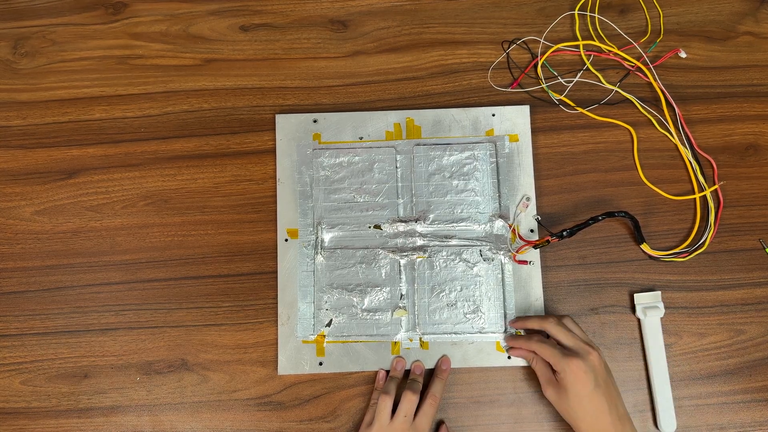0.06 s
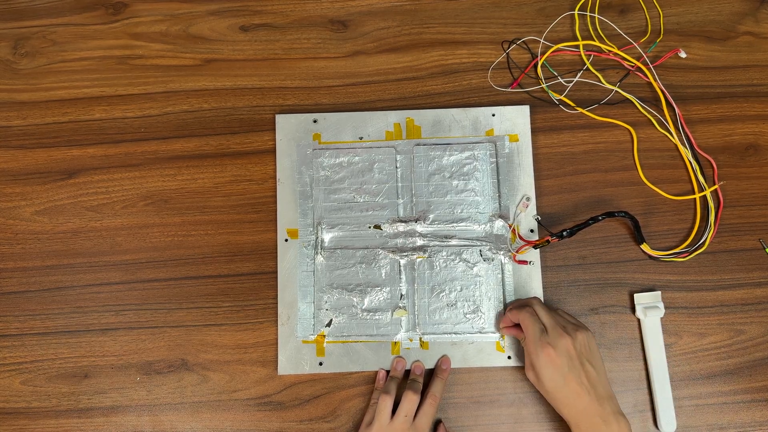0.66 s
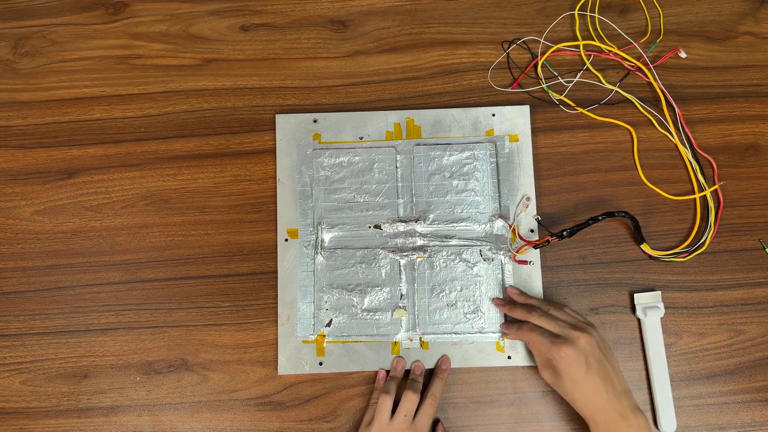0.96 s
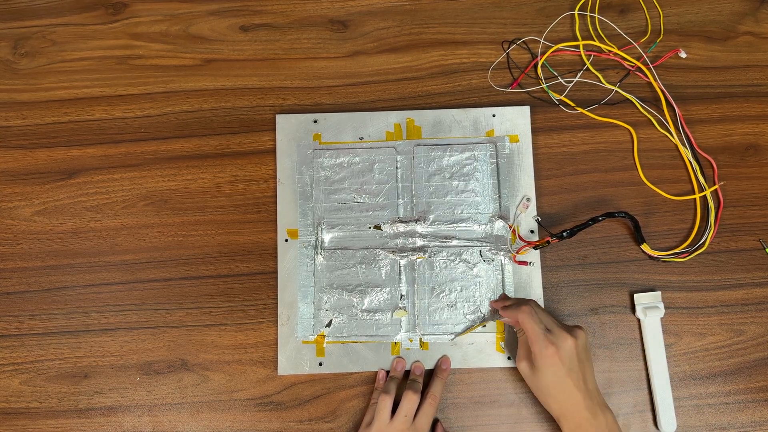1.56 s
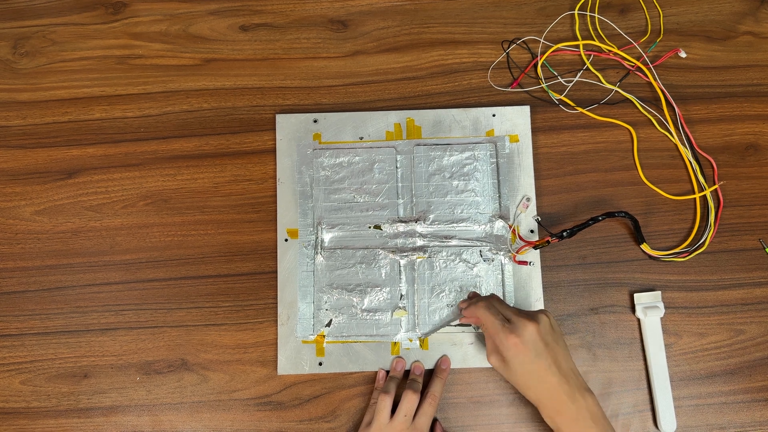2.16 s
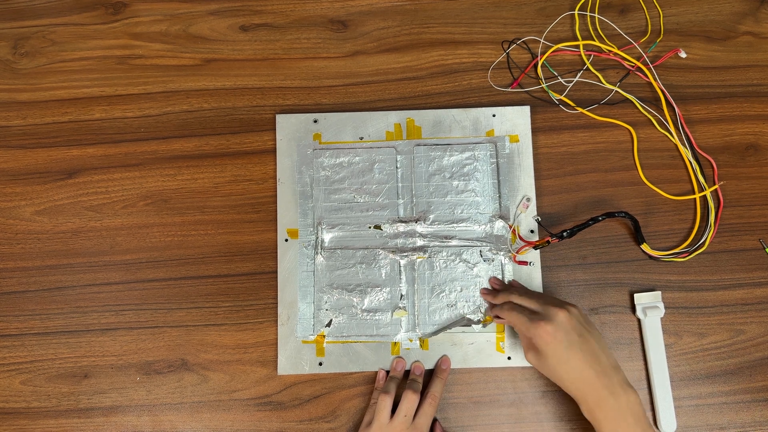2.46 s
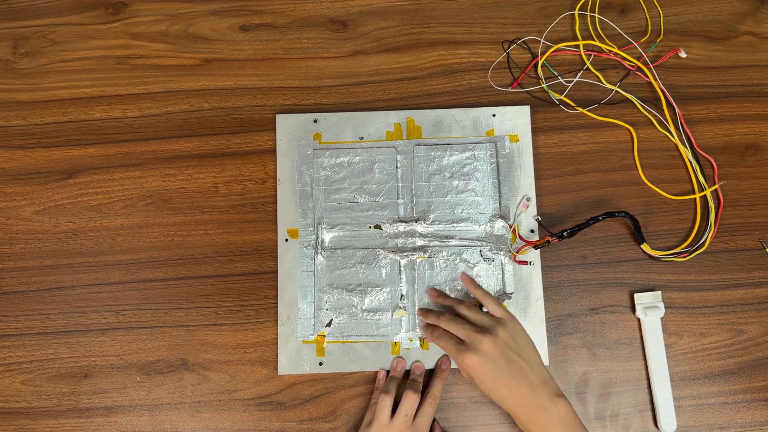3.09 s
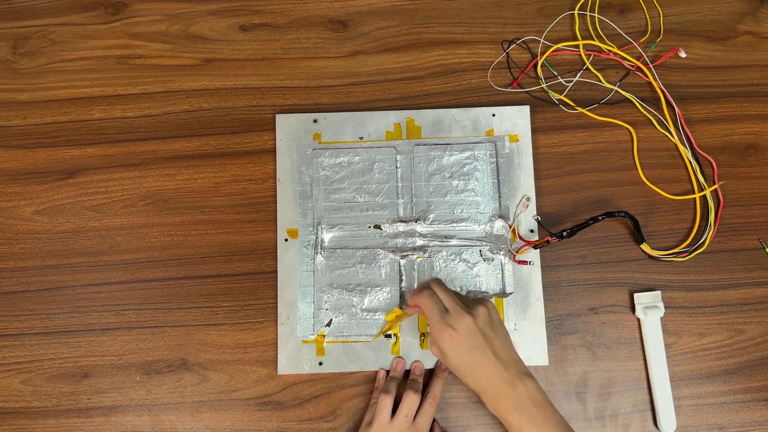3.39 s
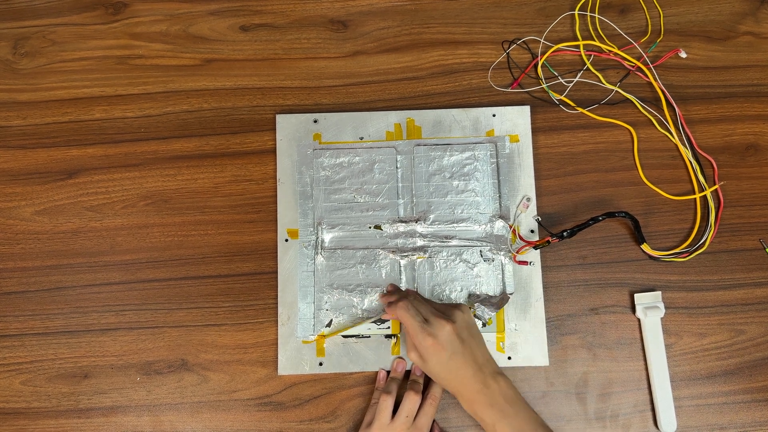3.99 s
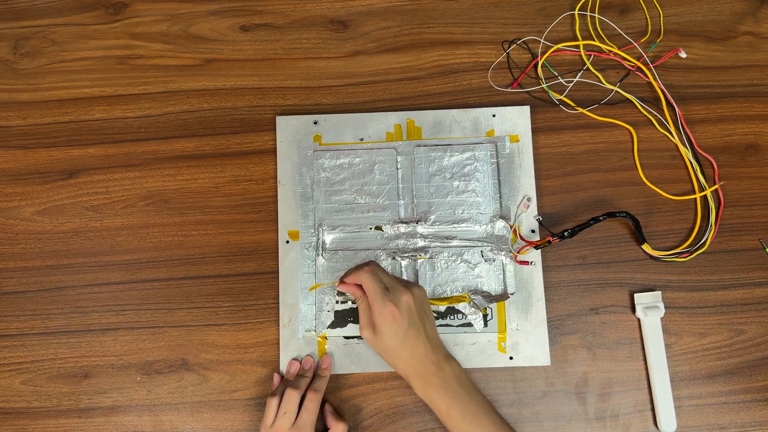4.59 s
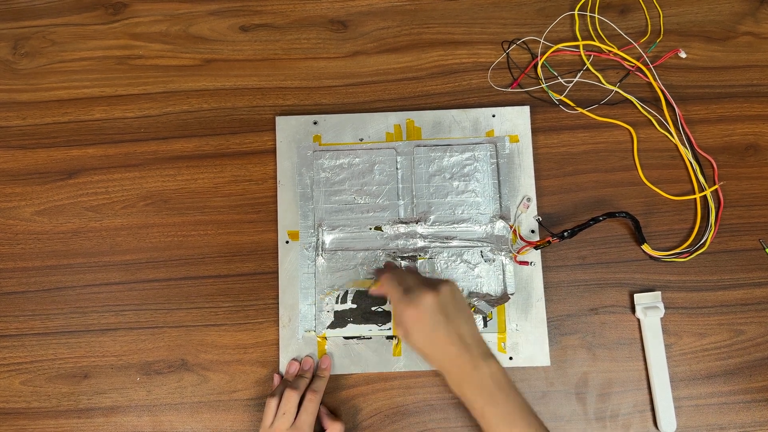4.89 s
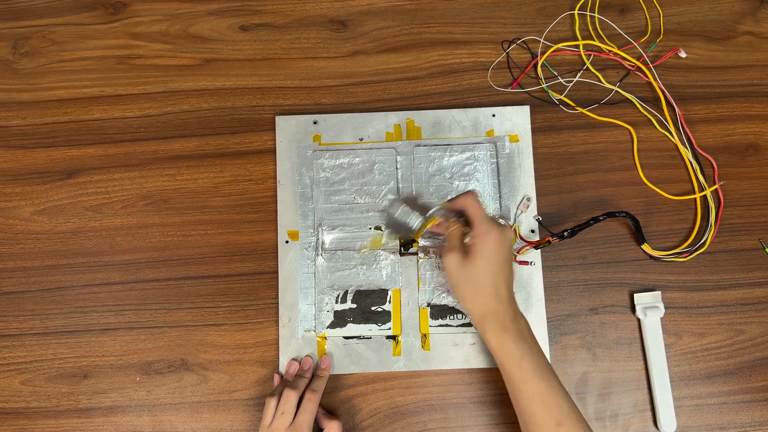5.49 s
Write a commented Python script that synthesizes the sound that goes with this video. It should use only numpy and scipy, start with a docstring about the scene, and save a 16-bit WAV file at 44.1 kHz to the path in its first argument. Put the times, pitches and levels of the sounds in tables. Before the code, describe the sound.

Aluminium foil tape is picked loose from a metal plate with faint ticks and crackles, then pulled off in short, irregular tugs that grow louder. The glue fizzes, the foil crinkles and its creases snap, with one brief squeak early on. Harder pulls bump the plate softly on a wooden bench, and fingertips lightly pat the foil. It is heard close up in a small quiet room with low ventilation rumble.

```python
"""A wooden bench in a small quiet room, heard from close by through a camera's two microphone ports.
Straight ahead, aluminium foil tape is picked loose and pulled off a metal plate in short tugs.
The glue lets go in a fine fizz, the foil crinkles, its creases snap and the taut strip squeaks once.
Hard tugs bump the plate on the bench, and fingertips pat the foil. Ventilation rumbles low behind it."""
import sys
import numpy as np
from scipy import signal
from scipy.fft import rfft, irfft, next_fast_len
from scipy.io import wavfile
from scipy.ndimage import uniform_filter1d, map_coordinates

SR = 44100
rng = np.random.default_rng(int(sys.argv[2]) if len(sys.argv) > 2 else 0)


def master(y):
    """Save y as 16-bit WAV."""
    cut = np.clip(np.atleast_2d(y).T, -1, 1)
    pcm = np.round(cut * 32767)  # scale
    wavfile.write(sys.argv[1], SR, pcm.astype(np.int16))


N = 253507

# tone of the crinkling foil: freq_hz, level_db
FOIL_SPECTRUM = [(100, -2), (250, -14.5), (600, -6.5), (850, -13), (1200, -2), (2000, -2.5), (2600, -4.5),
                 (3500, -0.5), (4600, -11), (6500, -9), (15000, -22)]
# tone of the fizzing glue: freq_hz, level_db
GLUE_SPECTRUM = [(1000, -47.5), (2500, -7.5), (4000, -3.5), (5000, -3.5), (7000, 3), (9000, 1.5),
                 (12000, 0), (16000, -3)]
FOIL_TRIM_DB, GLUE_TRIM_DB = -0.26, -0.64
def peeling():
    """The tape sticks and slips: glue threads part and the foil crumples in the same quick spurts."""
    crinkle_db, fizz_db = pulling()
    spurts = unit(amp(1.3 * wobble(70) + .9 * wobble(300)))
    foil = crackle(FOIL_SPECTRUM, band_hz=(1000, 4000), spread_db=2.0, ring_s=0.0011, favour_db=5.0)
    glue = crackle(GLUE_SPECTRUM, band_hz=(5000, 10000), spread_db=-1.5, ring_s=0.00011, favour_db=5.5)
    # the low mids fill out as more strip comes free, and are a smaller share of a loud pull
    body = filtered(foil, lambda f: 1 / (1 + (f / 900) ** 8))
    body_db = 2.05 * (np.arange(N) / SR - 3.7) - 0.16 * (crinkle_db + 36)
    foil += body * (amp(np.clip(body_db, -6, 6)) - 1)
    # a gentle pull parts only the finest threads, so it sounds brighter
    finest = filtered(glue, lambda f: 1 / (1 + (9000 / (f + 1)) ** 8))
    bright_db = -.15 * (fizz_db + 50)
    glue += finest * (amp(np.clip(bright_db, -4, 5)) - 1)
    return spurts * (foil * amp(crinkle_db + FOIL_TRIM_DB) + glue * amp(fizz_db + GLUE_TRIM_DB))


# slow steady peeling: start_s, length_s, crinkle_db, fizz_db
SLOW_PEELS = [(0.301, 0.12, -93, -78), (1.05, .16, -81, -71), (1.246, 0.044, -67, -57),
              (1.335, 0.22, -64, -57), (2.11, 0.085, -74, -66), (2.689, 0.11, -58, -56.5),
              (3.1, 0.03, -68.5, -64), (3.821, 0.042, -63, -64.5), (3.885, 0.088, -53.5, -54.5),
              (4.403, .09, -60.5, -75), (5.088, 0.054, -61, -63.5), (5.335, 0.069, -62, -62.5),
              (5.647, 0.076, -65, -54)]
# short tugs, with the loose foil's resonance: full_force_s, rise_s, hold_s, crinkle_db, fizz_db, foil_hz
SHORT_TUGS = [(0.449, 0.032, 0.0066, -82, -64.5, 6700), (0.667, 0.058, .005, -62.5, -59.5, 3000),
              (1.502, .08, 0.023, -63, -54.5, 1500), (1.7, 0.03, 0.0044, -66.5, -63.5, 4500),
              (1.959, 0.089, .012, -52, -52.5, 4600), (1.987, 0.017, 0.0072, -39.5, -45.5, 4700),
              (2.278, 0.07, 0.011, -61, -62, 4600), (2.443, 0.0071, .003, -65.5, -71.5, 4500),
              (2.611, 0.12, 0.048, -48, -49.5, 4640), (2.849, 0.083, 0.016, -50.5, -47.5, 4570),
              (2.954, 0.023, 0.01, -55.5, -61.5, 1980), (3.175, 0.049, 0.027, -55, -59.5, 2700),
              (3.276, 0.11, 0.038, -49.5, -49, 3500), (3.406, 0.049, 0.015, -39, -37, 2100),
              (3.569, 0.013, 0.0049, -51, -57.5, 2200), (3.714, 0.025, .005, -62, -82, 1900),
              (4.05, 0.097, 0.02, -36.5, -37.5, 3000), (4.178, 0.025, 0.05, -54.5, -60, 1150),
              (4.536, .075, 0.013, -39, -49, 1400), (4.566, 0.037, 0.021, -36.5, -41, 750),
              (4.941, 0.068, 0.022, -34.5, -36.5, 2900), (5.015, 0.065, 0.021, -54.5, -52, 3330),
              (5.192, 0.046, .004, -69, -62.5, 4000), (5.421, 0.029, 0.0054, -47.5, -36.5, 4500),
              (5.552, 0.038, 0.0086, -40.5, -31.5, 3300)]
def pulling():
    """Peels, tugs and snaps work the tape; returns the running crinkle and fizz levels in dB."""
    crinkle, fizz = np.zeros((2, N))

    def pull(s, crinkle_db, fizz_db, rise_s, hold_s, swell_db=0):
        lead_s = .15
        t = np.arange(round(.8 * SR)) / SR - lead_s
        shape_db = pull_shape(t, rise_s, hold_s, swell_db)
        add(crinkle, s - lead_s, amp(crinkle_db + shape_db) ** 2)
        add(fizz, s - lead_s, amp(fizz_db + shape_db) ** 2)

    for s, length_s, crinkle_db, fizz_db in SLOW_PEELS:  # a peel swells as the strip tightens
        pull(s, crinkle_db, fizz_db, rise_s=0.037, hold_s=length_s, swell_db=1.5)
    for s, rise_s, hold_s, crinkle_db, fizz_db, _ in SHORT_TUGS:
        pull(s, crinkle_db, fizz_db, rise_s, hold_s)
    for s, _, _, crack_db, _ in CREASE_SNAPS:  # a snap shakes the foil around it
        pull(s, crack_db - 26, crack_db - 25, rise_s=0.012, hold_s=0.012)
    return 10 * np.log10(np.array([crinkle, fizz]) + 1e-11)


RISE_DB, RELEASE_DB_PER_S = 33, 484.5
SETTLE_DB, SETTLE_DB_PER_S = -9.5, 259
def pull_shape(t, rise_s, hold_s, swell_db):
    """One pull in dB: it builds and holds, the hand eases, and the crumpled foil settles quietly."""
    building = RISE_DB * np.minimum(t, 0) / rise_s
    swelling = swell_db * (np.clip(t / hold_s, 0, 1) - .5)
    after_s = np.maximum(t - hold_s, 0)
    easing = np.maximum(-RELEASE_DB_PER_S * after_s, SETTLE_DB - SETTLE_DB_PER_S * after_s)
    return building + swelling + easing


def crackle(spectrum, band_hz, spread_db, ring_s, favour_db, clicks_per_s=9000):
    """Dense tiny clicks of uneven size, each ringing a facet of its own pitch; rms 1 within band_hz."""
    when, pitch, chance, phase = rng.random((int(clicks_per_s * N / SR), 4)).T[:, :, None]
    t = np.arange(160) / SR
    hz = 300 * (SR / 2 / 300) ** pitch
    # facets near the loose foil's resonance ring louder
    tug_s, *_, foil_hz = np.transpose(SHORT_TUGS)
    octaves_off = np.log2(hz / np.interp(when * N / SR, tug_s, foil_hz))
    resonance_db = favour_db * np.exp(-(octaves_off / 0.43) ** 2)
    uneven_db = spread_db * np.minimum(-np.log(1 - chance), 3)
    size = amp(uneven_db + resonance_db) * np.sqrt(hz)
    grains = size * np.exp(-t / ring_s) * np.sin(2 * np.pi * (hz * t + phase))
    positions = (when * N).astype(int) + np.arange(len(t))
    clicks = np.bincount(positions.ravel(), grains.ravel(), N)[:N]
    sound = flexing(filtered(clicks, lambda f: amp(along(spectrum, f))))
    return sound / np.std(filtered(sound, lambda f: (f > band_hz[0]) & (f < band_hz[1])))


# resonances of the freed strip: centre_hz, width_hz, lift_db
STRIP_RESONANCES = [(720, 200, 3.5), (1110, 190, 4.5), (2017, 140, 10), (3330, 300, -1.5), (4570, 300, 5),
                    (4900, 370, 3), (9350, 530, 2), (12200, 810, 3.5)]
def flexing(x, patchy_db=3.5):
    """The bending foil favours new pitches from moment to moment, over the strip's own resonances."""
    hz, _, spectra = signal.stft(x, SR, nperseg=256)
    patches = uniform_filter1d(rng.standard_normal(spectra.shape), size=3, axis=0)
    patches = unit(uniform_filter1d(patches, size=11, axis=1))
    lift_db = sum(db / (1 + (2 * (hz - centre) / width) ** 2) for centre, width, db in STRIP_RESONANCES)
    return signal.istft(spectra * amp(patchy_db * patches + lift_db[:, None]), SR, nperseg=256)[1][:N]


# creases snapping through: start_s, ring_db, pitch_hz, crack_db, t60_s
CREASE_SNAPS = [(0.457, -50.5, 6750, -46, 0.042), (0.557, -46, 7270, -46.5, 0.016),
                (0.857, -43, 3680, -36, 0.017), (1.2298, -32, 3910, -29, 0.023),
                (1.658, -55, 1600, -54.5, 0.014), (1.9932, -33, 4500, -23.5, 0.016),
                (2.785, -39, 1810, -36.5, 0.013), (3.25, -44, 6830, -37, 0.028),
                (3.28, -36.5, 3970, -41.5, .017), (3.3975, -34, 1960, -49, 0.019),
                (3.415, -28, 2075, -33, 0.034), (3.431, -29, 2066, -20, 0.034),
                (3.504, -41, 3300, -34, 0.01), (3.7617, -49, 6500, -40.5, 0.02),
                (3.891, -25.5, 1917, -35.5, 0.014), (4.011, -40, 1974, -54, 0.069),
                (4.0359, -28.5, 2150, -28, 0.014), (4.0455, -31, 2980, -36, 0.0061),
                (4.0605, -24.5, 3616, -22, 0.015), (4.17, -41, 3820, -55, 0.012),
                (4.545, -29, 1770, -39, 0.014), (4.703, -51, 1710, -38.5, 0.012),
                (4.749, -34, 2160, -39, 0.01), (4.79, -48, 4300, -43, 0.014),
                (4.8749, -41, 2120, -38.5, 0.011), (4.8905, -34, 2000, -50, 0.0082),
                (4.929, -31, 2090, -46, 0.022), (4.938, -29.5, 3250, -29, 0.059),
                (5.042, -54, 3230, -37, 0.016), (5.421, -27, 7130, -26, 0.011),
                (5.426, -38, 7130, -24, .022), (5.542, -36, 6450, -30, 0.017),
                (5.553, -15.5, 4960, -16.5, 0.0097), (5.5622, -18.5, 4370, -25.5, 0.0084),
                (5.688, -42, 6340, -35, 0.017)]
def snaps():
    """Creases buckle with a crack and a ring; the longer a snap lasts, the brighter its crack."""
    track, t = np.zeros(N), np.arange(2048) / SR
    for s, ring_db, hz, crack_db, t60 in CREASE_SNAPS:
        tilt = max(8.5 * np.log2(t60 / 0.018), -2.5)
        snap = amp(ring_db) * fold(hz, t) + amp(crack_db) * crack(t, tilt)
        add(track, s, snap * struck(t, t60))
    return track


def fold(hz, t):
    """A fold's ring at rms 1; it changes shape while it rings, so the pitch wavers."""
    phase = 2 * np.pi * hz * t + 0.13 * np.cumsum(rng.standard_normal(len(t)))
    return unit(np.sin(phase) + amp(-6.5) * np.sin(1.55 * phase))


# tone of a crack before its tilt: freq_hz, level_db
CRACK_SPECTRUM = [(300, -24), (1200, -9.5), (3000, 0), (6000, -3.5), (10000, 0), (15800, -6.5),
                  (18000, -36)]
def crack(t, tilt_db_per_octave):
    """The dry noise of a snap, tick or pat, at rms 1."""
    tone = lambda f: amp(along(CRACK_SPECTRUM, f) + tilt_db_per_octave * np.log2(f + 300))
    return unit(filtered(rng.standard_normal(len(t)), tone))


# the plate dropping back on the bench: start_s, level_db, pitch_hz, overtone_db, t60_s
PLATE_BUMPS = [(0.674, -42, 127, -19, 0.11), (1.235, -34, 150.5, -1, 0.08), (2.002, -31, 125.3, -17, 0.16),
               (2.624, -41.5, 131, -3, 0.13), (2.971, -40.5, 128, -28, 0.095),
               (3.297, -38, 131, -35.5, 0.25), (3.428, -36.5, 121, -29, 0.2), (4.069, -33, 149, -21, 0.12),
               (4.548, -37, 130.8, -12, 0.22), (4.583, -30.5, 142, -18.5, 0.12),
               (4.954, -40, 167, -27, 0.16), (5.434, -33.5, 131, -19.5, 0.23),
               (5.561, -31, 129, -18.5, 0.21)]
def bumps():
    """The plate gives a short soft boom on the bench top, with an overtone that dies sooner."""
    track, t = np.zeros(N), np.arange(SR // 3) / SR
    for s, db, hz, overtone_db, t60 in PLATE_BUMPS:
        bend = 0.017 * np.cumsum(rng.standard_normal(len(t)))  # the hand's pressure bends the pitch
        phase = 2 * np.pi * hz * t + bend
        overtone = amp(overtone_db + 3.0) * np.sin(1.806 * phase) * amp(-40 * t / t60)
        add(track, s, amp(db + 0.5) * (np.sin(phase) + overtone) * struck(t, t60, attack_s=0.00099))
    return track


# glue threads breaking: start_s, level_db
THREAD_TICKS = [(0.298, -59), (0.659, -43), (1.077, -40.5), (1.8995, -41), (2.609, -34), (4.064, -22),
                (4.375, -42.5), (4.535, -32), (5.519, -33), (5.656, -30)]
def ticks():
    """Single glue threads break with a bright tick and no ring."""
    track, t = np.zeros(N), np.arange(2048) / SR
    for s, db in THREAD_TICKS:
        add(track, s, amp(db) * crack(t, tilt_db_per_octave=11) * struck(t, t60_s=0.02))
    return track


# fingertips on the foil: start_s, level_db
FINGER_PATS = [(4.186, -44), (4.223, -42), (4.397, -51)]
def pats(pitch_hz=1127):
    """Fingertips pat the foil and ring it low, with a duller crack."""
    track, t = np.zeros(N), np.arange(2048) / SR
    for s, db in FINGER_PATS:
        pat = fold(pitch_hz, t) + amp(-4.5) * crack(t, tilt_db_per_octave=-2)
        add(track, s, amp(db) * pat * struck(t, t60_s=0.05))
    return track


# the taut strip singing lower as it lengthens: time_s, pitch_hz, level_db
SQUEAK_GLIDE = [(1.419, 2150, -83), (1.445, 2000, -64), (1.47, 1750, -63), (1.526, 1312, -68),
                (1.531, 1180, -42.5), (1.55, 1080, -83)]
def squeak():
    """Quick uneven slips make the taut strip sing a rough falling note."""
    s, hz, db = np.transpose(SQUEAK_GLIDE)
    t = np.arange(N) / SR
    pitch_hz = np.interp(t, s, hz) * (1 + .08 * wobble(900))
    note = unit(np.sin(2 * np.pi * np.cumsum(pitch_hz) / SR) * amp(2.6 * wobble(250)))
    return note * amp(np.interp(t, s, db)) * (t > s[0]) * (t < s[-1])


# decay of the small room: freq_hz, t60_s
ROOM_DECAY = [(150, 0.26), (1000, 0.065), (5000, 0.14), (15000, 0.1)]
def room(x, delay_s=.004):
    """The room returns a short diffuse tail to each port, the bass lingering longest."""
    hz, t, spectra = signal.stft(rng.standard_normal((2, SR // 2)), SR, nperseg=256)
    decay = amp(-60 * t / along(ROOM_DECAY, hz)[:, None])
    mid, side = signal.istft(spectra * decay, SR, nperseg=256)[1]
    width = [(150, -8.5), (700, 8.5), (1400, 9), (2500, -7), (12000, -3.5)]  # freq_hz, side_db
    side = filtered(side, lambda f: amp(along(width, f)))
    tails = np.array([mid + side, mid - side]) / np.linalg.norm(mid)
    delayed = np.pad(x, (round(delay_s * SR), 0))
    return signal.fftconvolve(delayed[None], tails, axes=1)[:, :N]


# room tone from the ventilation: freq_hz, level_db
VENT_SPECTRUM = [(20, -26), (38, -6), (58, 5.5), (85, -4.5), (125, -0.5), (200, -7), (330, -9), (470, -16),
                 (720, -14.5), (1200, -23), (2400, -28), (4250, -42), (9000, -51.5), (14000, -79)]
# how alike that air is at the two ports: freq_hz, coherence
VENT_COHERENCE = [(60, 1), (130, 0.97), (290, 0.83), (640, 0.29), (1400, 0.32), (3100, 1), (7000, .85),
                  (15000, .7)]
def ventilation(level_db=-52.5):
    """Steady ventilation rumble, alike at both ports in the bass."""
    width = lambda f: np.tan(np.arccos(np.clip(along(VENT_COHERENCE, f), -1, 1)) / 2)
    tone = lambda f: amp(along(VENT_SPECTRUM, f)) * np.array([np.ones_like(f), width(f)])
    mid, side = filtered(rng.standard_normal((2, N)), tone)
    return amp(level_db) * np.array([mid + side, mid - side]) / np.std(mid)


def struck(t, t60_s, attack_s=0.00023):
    """Envelope of an impact: a quick rise, then 60 dB of decay every t60_s."""
    return amp(-60 * t / t60_s) * (1 - np.exp(-t / attack_s))


def amp(db):
    """Decibels to gain."""
    return 10 ** (np.asarray(db) / 20)


def unit(x):
    """x at rms 1."""
    return x / np.sqrt(np.mean(x ** 2) + 1e-20)


def along(points, hz):
    """(freq_hz, value) points read on a log axis."""
    freqs, values = np.transpose(points)
    return np.interp(np.log(hz + 1), np.log(freqs + 1), values)


def wobble(knots_per_s):
    """A smooth random curve."""
    knots = rng.standard_normal(int(N * knots_per_s / SR) + 4)
    return map_coordinates(knots, [np.arange(N) * knots_per_s / SR])


def filtered(x, response):
    """x through a frequency response."""
    n = x.shape[-1]
    padded = next_fast_len(n + 8192)
    return irfft(rfft(x, padded) * response(np.fft.rfftfreq(padded, 1 / SR)), padded)[..., :n]


def add(track, s, sound):
    """Mix a sound into the track at s seconds."""
    part = track[round(s * SR):][:len(sound)]
    part += sound[:len(part)]


def scene():
    """Tape and plate straight ahead of the camera, with the room faint behind them."""
    bench = peeling() + squeak() + snaps() + ticks() + pats() + bumps()
    return bench + amp(-18.0) * room(bench) + ventilation()


# treble colour of the camera's microphone ports: freq_hz, gain_db
MIC_COLOUR = [(6000, -0.5), (7500, -2.5), (8800, 1), (9700, 4), (10800, -1.5), (12300, -3), (13500, -4.5),
              (14700, -1), (15400, -4)]
# phase by which the left port leads the right: freq_hz, lead_rad
MIC_PHASE = [(2200, 0), (2800, .45), (4300, .45), (5000, 0), (6600, 0), (7300, -1.1), (8300, 1), (9300, 0),
             (11100, -3.1), (12800, -6.3), (14600, -9.4), (15800, -11.4)]
LOW_CUT_HZ, TOP_HZ, OPEN_S = 28, 16050, .124
def record(dry):
    """The ports colour the treble and shift its phase; the sound is band-limited and opens after a beat."""
    lead = lambda f: np.exp(.5j * np.outer([1, -1], along(MIC_PHASE, f)))
    low_cut = lambda f: f / np.hypot(f, LOW_CUT_HZ)
    heard = filtered(dry, lambda f: amp(along(MIC_COLOUR, f)) * low_cut(f) * lead(f))
    opening = np.clip((np.arange(N) / SR - OPEN_S) / .005, 0, 1)
    return filtered(heard * opening, lambda f: 1 / np.sqrt(1 + (f / TOP_HZ) ** 300))


dry = scene()
out = record(dry)
master(out)
```